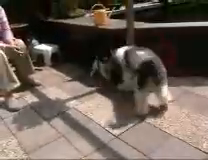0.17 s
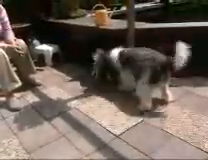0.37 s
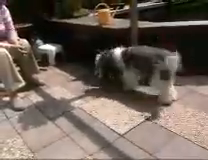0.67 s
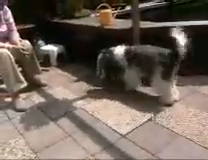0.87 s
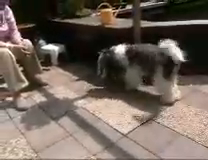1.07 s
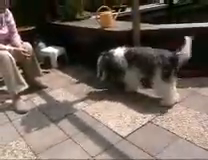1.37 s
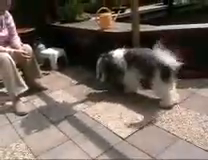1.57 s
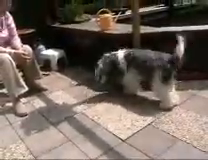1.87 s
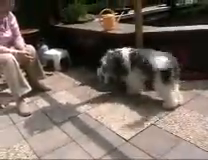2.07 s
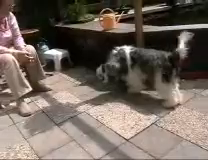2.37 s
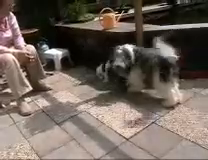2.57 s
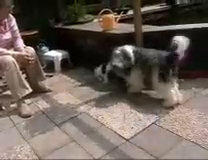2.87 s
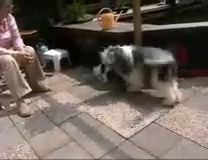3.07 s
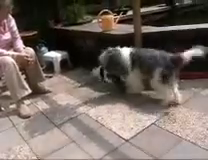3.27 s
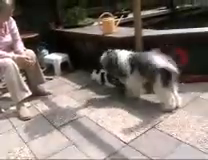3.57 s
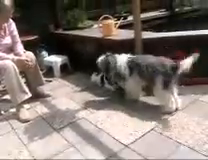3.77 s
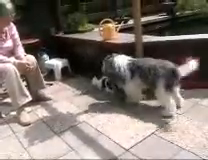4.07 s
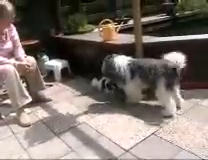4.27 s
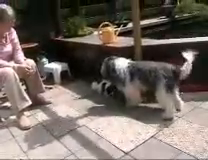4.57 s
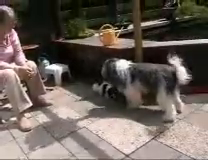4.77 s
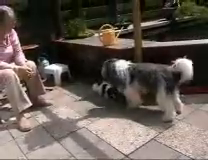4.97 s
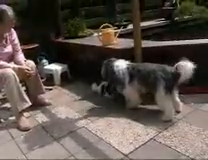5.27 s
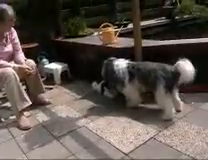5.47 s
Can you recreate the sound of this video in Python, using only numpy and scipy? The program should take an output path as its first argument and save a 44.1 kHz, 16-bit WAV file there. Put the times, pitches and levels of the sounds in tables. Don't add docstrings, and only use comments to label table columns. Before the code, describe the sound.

Two quick barks, a lone one, then three more echo off patio walls; light panting, claws on paving, distant low drone and outdoor hiss.

```python
import sys
import numpy as np
from scipy import signal
from scipy.io import wavfile
from scipy.ndimage import uniform_filter1d

SR = 44100
rng = np.random.default_rng(int(sys.argv[2]) if len(sys.argv) > 2 else 0)


def generate_wav(signal):
    frames = np.transpose(np.atleast_2d(signal))
    scaled = np.clip(frames, -1, 1) * 32767
    pcm = np.round(scaled).astype(np.int16)
    wavfile.write(sys.argv[1], SR, pcm)


def to_linear_factor(level_db):
    exponent = np.asarray(level_db, float) / 20
    return 10 ** exponent


N = 248705
TIME = np.arange(N) / SR


def evened(x):
    return x / np.sqrt(np.mean(x ** 2) + 1e-20)


def read(points, hz):
    f, value = np.transpose(points)
    return np.interp(np.log(hz + 1), np.log(f + 1), value)


def add(mix, s, sound):
    part = mix[round(s * SR):][:len(sound)]
    part += sound[:len(part)]


def resonate(x, hz, width):
    turn = np.exp(2j * np.pi * np.cumsum(hz * np.ones(len(x))) / SR)
    r = np.exp(-np.pi * width / SR)
    return 2 * (turn * signal.lfilter([1 - r], [1, -r], x / turn)).real


def resonate_twice(x, hz, width):
    return resonate(resonate(x, hz, width), hz, width)


def highpass(x, order, hz):
    return signal.sosfilt(signal.butter(order, hz, "high", fs=SR, output="sos"), x)


def wander(length, span):
    return evened(uniform_filter1d(uniform_filter1d(rng.standard_normal(length), span), span))


def step(x):
    return .5 + .5 * np.tanh(x)


# (frequency [Hz], density [dB per Hz])
WASH_SPECTRUM = [(30, -35.5), (70, -6), (144, -9), (330, -12.5), (600, -16.5), (1000, -15.5), (1220, -20.5),
                 (1450, -17.5), (2440, -22), (5780, -24.5), (8360, -30.5), (9500, -41)]
# (frequency [Hz], left-right coherence [0-1])
COHERENCE = [(40, 0.9), (160, 1), (450, 0.98), (1240, 0.59), (3400, 0.32), (5500, 0.9), (7500, 1)]
WASH_DB = -45


def wash():
    frames, hz = N // 256 + 5, np.fft.rfftfreq(1024, 1 / SR)
    a, b, c, d, patches = rng.standard_normal((frames, 513, 5)).T
    patches = evened(uniform_filter1d(uniform_filter1d(patches, 12, 0), 14, 1))
    flicker = evened(uniform_filter1d(rng.standard_normal(frames), 4))
    same = np.clip(read(COHERENCE, hz), 0, 1)[:, None]
    mid = a + 1j * b
    side = 0.51 * np.sqrt((1 - same) / (1 + same)) * (c + 1j * d)
    from_notch = (hz + 450) % 905 - 450
    notch_db = -9 * np.exp(-(from_notch / 35) ** 2) * (hz > 400) * (hz < 2200)
    z = np.array([mid + side, mid - side])
    z *= to_linear_factor((read(WASH_SPECTRUM, hz) + notch_db)[:, None] + 0.5 * patches + 1.8 * flicker)
    noise = signal.istft(z, nperseg=1024, noverlap=768)[1][:, :N]
    return to_linear_factor(WASH_DB - 0.5) * evened(noise)


def wind():
    band = signal.butter(3, [30, 90], "band", fs=SR, output="sos")
    rumble = signal.sosfilt(band, rng.standard_normal((2, N)))
    rumble = evened(rumble) * to_linear_factor(2.3 * wander(N, 5000) - 69.5)
    return rumble + 0.3 * rumble[::-1]


# (time [s], level [dB])
ENGINE_LOAD = [(0, -53), (.25, -47.5), (.4, -56.5), (1.0, -51.5), (1.18, -47.5), (1.55, -49), (1.65, -58.5),
               (2.06, -53), (2.18, -52), (2.3, -51), (2.6, -53.5), (2.98, -42.5), (3.2, -47.5),
               (4.1, -49.5), (4.37, -43.5), (4.75, -50), (5.36, -45.5), (5.5, -59)]
HUM_HZ, HUM_WAVER = 111, .012
DRONE_DB, DRONE_FOLLOWS = -55, 0.74


def hum():
    level_db = np.interp(TIME, *np.transpose(ENGINE_LOAD))
    hz = HUM_HZ * (1 + HUM_WAVER * wander(N, 4000))
    drone_db = DRONE_DB + DRONE_FOLLOWS * (level_db + 55.5) - level_db
    line = np.sqrt(2) * np.sin(2 * np.pi * np.cumsum(hz) / SR)
    line *= 1 + 0.2 * wander(N, 900)
    fuzz = evened(resonate_twice(rng.standard_normal(N), hz, 22))
    apart = evened(resonate_twice(rng.standard_normal(N), hz, 22))
    drone = evened(resonate(resonate(rng.standard_normal(N), 1.75 * hz, 30), 1.8 * hz, 34))
    mid = 1.45 * line + .5 * fuzz + to_linear_factor(drone_db - 3.0) * drone
    return to_linear_factor(level_db - 3.5) * np.array([mid + 0.18 * apart, mid - 0.19 * apart])


# (time of full force [s], length [s], held level [dB], sag over the bark [dB])
BARK_TIMES = [
    (.347, 0.2, -16, -9),
    (.618, 0.14, -14, -11),
    (1.778, 0.18, -15, -9.5),
    (3.093, .2, -12.5, -14.5),
    (3.401, 0.14, -16, -8.5),
    (3.797, 0.16, -14.5, -10),
]
# (rise [s], burst over the held level [dB], chest push [dB], bright rasp [dB])
BARK_ONSETS = [(.047, 1, -58.5, -64.5), (.022, -3.5, -45.5, -47), (.018, 7.5, -34.5, -36),
               (0.009, 8, -27.5, -28.5), (.009, 3, -47, -46.5), (.011, 4.5, -28, -41)]
# (roughness [0-1], second resonance [dB], upper resonances [dB],
# mouth opening [factor], extra gape at the burst [factor])
BARK_COLOURS = [(.36, -7, -2, 1.03, .18), (.24, 1, -1, 1.06, -.04), (.33, 2, -5, 1.08, -.08),
                (.32, 7, -6, 1.09, -.06), (.19, 2, -8, 1.0, .01), (.24, -1, -10, 1.01, .04)]
# (start [Hz], top [Hz], end [Hz], middle of the leap [s], half its length [s])
BARK_PITCHES = [(250, 722, 680, .027, .016), (310, 690, 610, .013, .02), (290, 715, 575, .024, .02),
                (400, 728, 652, .025, .012), (310, 622, 600, .017, .021), (330, 652, 600, .027, .021)]
RISE_DB, BURST_S, RELEASE_S, RELEASE_DB = -34, 0.016, 0.034, -10
DROP_FROM, DROP_SPAN, GAPE_S = .66, .12, .03
SECOND_FADE_DB, UPPER_FADE_DB = -17.5, -22.5
ROUGH_GROWTH, MOUTH_CLOSE = 0.29, .05
SLIP_DB, SLIP_S = 2.5, 0.012


def bark_shape(t, row, onset, colour, pitch):
    _, length, held_db, sag_db = row
    rise, burst_db, *_ = onset
    rough, second_db, upper_db, mouth, gape = colour
    start_hz, top_hz, end_hz, leap, half = pitch
    done = np.clip(t / length, 0, 1)
    slips_db = np.array([wander(len(t), int(SLIP_S * SR)) for control in range(3)])
    slips_db *= SLIP_DB * np.clip(t / 0.017, 0, 1)

    level_db = held_db + burst_db * np.exp(-abs(t) / BURST_S) + sag_db * done + slips_db[0]
    level_db += RISE_DB * np.clip(-t / rise, 0, 1)
    level_db += RELEASE_DB * np.clip(1 + (t - length) / RELEASE_S, 0, 1)
    hz = start_hz + (top_hz - start_hz) * step((t - leap) / half)
    hz -= (top_hz - end_hz) * step((done - DROP_FROM) / DROP_SPAN)
    second_db = second_db + SECOND_FADE_DB * step((done - .78) / 0.15) + slips_db[1]
    upper_db = upper_db + UPPER_FADE_DB * done ** 0.88 + slips_db[2]
    rough = rough * (1 + ROUGH_GROWTH * (done - .5))
    mouth = mouth * (1 - MOUTH_CLOSE * done ** 4) + gape * np.exp(-(t / GAPE_S) ** 2)
    return level_db, hz, second_db, upper_db, rough, mouth


# (frequency [Hz], width [Hz], level [dB])
THROAT_RESONANCES = [(685, 315, 2.5), (1304, 646, 0.5), (2020, 1060, 2), (2794, 680, -3), (4540, 2400, -22)]
CHEST_DB = -13.5


def bark(row, onset, colour, pitch):
    t = np.arange(-onset[0], row[1], 1 / SR)
    level_db, hz, second_db, upper_db, rough, mouth = bark_shape(t, row, onset, colour, pitch)
    rough = np.clip(rough, 0, 1)
    turns = np.cumsum(hz * (1 + 0.053 * rough * wander(len(t), 60))) / SR
    folds = sum(np.cos(2 * np.pi * k * turns) / k ** 0.073 for k in range(1, 11))
    folds = evened(folds) * (1 + 1.34 * rough * wander(len(t), 120))
    puffs = evened((0.43 + np.exp(-(turns % 1) / 0.34)) * rng.standard_normal(len(t)))
    puffs = highpass(puffs, 4, 520)

    opening_db = [0, second_db, upper_db, upper_db, -4 + 3 * wander(len(t), 900)]
    voice = 0
    for k, ((f, width, db), open_db) in enumerate(zip(THROAT_RESONANCES, opening_db)):
        noisy = np.clip(rough * (f / 900) ** 0.91, 0, 1)
        drive = (1 - noisy) * folds + 1.7 * noisy * puffs
        sign = (-1) ** k
        voice = voice + sign * to_linear_factor(db + open_db) * resonate_twice(drive, f * mouth, width)
    chest = to_linear_factor(CHEST_DB) * np.cos(2 * np.pi * turns) * np.clip(2 - hz / 300, 0, 1)
    voice = evened(voice) + chest

    treble = signal.butter(3, 3300, "high", fs=SR, output="sos")
    voice -= 0.39 * signal.sosfiltfilt(treble, voice)
    voice -= .75 * resonate(voice, 1870, 260)
    voice = highpass(voice, 2, 220)
    voice /= np.sqrt(uniform_filter1d(voice ** 2, 900) + 1e-9)
    return row[0] - onset[0], to_linear_factor(level_db - 2.0) * voice * signal.windows.tukey(len(t), .05)


def thump(s, db, crack_db):
    push = uniform_filter1d(rng.standard_normal(1400), 70)
    swell = np.exp(-((np.arange(1400) / SR - .012) / .009) ** 4)
    rasp = np.diff(rng.standard_normal(1401)) * swell
    return s - .008, to_linear_factor(db) * evened(push) * np.hanning(1400) + to_linear_factor(crack_db) * rasp


# (frequency [Hz], t60 [s])
WALL_DECAY = [(200, 0.67), (650, 1.64), (1300, 1.06), (2500, 0.84), (6000, 0.52)]


def yard(x, start, length, speed):
    taps = np.zeros((2, length))
    at = np.arange(start, length - 20, 20)
    at = at + rng.integers(0, 20, (2, len(at)))
    np.put_along_axis(taps, at, rng.choice([-1., 1.], at.shape), 1)
    hz, t, z = signal.stft(taps, SR, nperseg=256)
    decay = to_linear_factor(-60 * speed * t / read(WALL_DECAY, hz)[:, None])
    tail = signal.istft(z * decay, SR, nperseg=256)[1]
    tail = np.array([tail[0] + .55 * tail[1], tail[0] - .55 * tail[1]])
    return signal.fftconvolve(x[None], tail / np.linalg.norm(tail[0]), axes=1)[:, :N]


# (frequency [Hz], level [dB], t60 [s])
CAN_MODES = [(544, -27, 1.9), (628, -40, 2.3), (641.4, -36, 2.24), (653, -34.5, 2.32), (660.5, -30.5, 1.93),
             (716, -34.5, 1.82), (1280, -38, 0.7), (1375, -35.5, .8)]


def can(x):
    t = np.arange(2 * SR) / SR
    ring = sum(to_linear_factor(db - 46 - 60 * t / t60) * np.sin(2 * np.pi * hz * t) for hz, db, t60 in CAN_MODES)
    return signal.fftconvolve(x, ring)[:N] * np.array([[1.15], [.85]])


DUCK_DEPTHS = [3.4, 13.6, 6.8, 4.7, 9, 7.4]


def camera_gain():
    duck_db = np.zeros(N)
    for (s, length, *_), db in zip(BARK_TIMES, DUCK_DEPTHS):
        fall = np.clip((TIME - s) / 0.049, 0, 1)
        rise = np.clip(1 - (TIME - s - length - .06) / 0.32, 0, 1)
        duck_db = np.maximum(duck_db, db * fall * rise)
    return to_linear_factor(-duck_db)


# (time [s], length [s], frequency [Hz], level [dB], octave [dB])
WHISTLE_NOTES = [
    (0.436, 0.065, 1123, -28.5, -2),
]


def whistle(s, length, hz, db, octave_db):
    turns = np.cumsum(hz * (1 + 0.013 * wander(int(length * SR), 200))) / SR
    tone = np.sin(2 * np.pi * turns) + to_linear_factor(octave_db) * np.sin(4 * np.pi * turns)
    tone *= 1 + .5 * wander(len(tone), 150)
    return s, to_linear_factor(db) * tone * np.hanning(len(tone)) ** .5


# (time [s], peak level [dB], frequency [Hz])
CLAW_TICKS = [(0.8977, -70, 2760), (2.1143, -40.5, 5240), (2.333, -48, 5898), (2.3545, -49, 2703),
              (2.465, -43.5, 2650), (2.5189, -45, 2647), (2.843, -38, 3000), (3.011, -43, 2600),
              (4.1204, -50, 2600), (4.4367, -41, 3450), (4.9502, -47, 5960), (5.1135, -44, 2685),
              (5.3462, -45, 4470), (5.4053, -42.5, 5740), (5.6103, -48, 2940)]


def claw(s, db, hz):
    t = np.arange(900) / SR
    grit = rng.standard_normal(900) * to_linear_factor(-60 * t / .03)
    return s, to_linear_factor(db - 6.5) * evened(resonate_twice(grit, hz, 1100))


# (time [s], length [s], level [dB], mouth resonance [Hz], brightness [dB])
PANT_PUFFS = [
    (1.191, 0.084, -69, 1226, -5),
    (2.237, 0.061, -49.5, 1190, -0.5),
    (2.453, 0.1, -45.5, 1300, -9),
    (2.754, 0.096, -47, 1380, -25),
    (4.254, 0.13, -45.5, 1310, -5.5),
    (4.679, 0.089, -50, 1426, 0),
    (5.032, 0.071, -48.5, 1400, -5),
    (5.341, 0.045, -55.5, 1440, 6),
    (5.583, 0.077, -49, 1450, -6),
]


def pant(s, length, db, hz, bright_db):
    air = rng.standard_normal(int(length * SR))
    mouth = evened(resonate_twice(air, hz, 440))
    mouth = mouth + to_linear_factor(bright_db) * evened(resonate(air, 2000, 1300))
    return s, to_linear_factor(db) * mouth * np.hanning(len(air)) ** 0.38


# (time [s], left minus right [dB])
CAMERA_TURN = [(0, 2.4), (.8, 2.2), (1.2, .6), (1.8, 1), (3, 0), (5.64, -.3)]


def scene():
    voice, small = np.zeros(N), np.zeros(N)
    for row, onset, colour, pitch in zip(BARK_TIMES, BARK_ONSETS, BARK_COLOURS, BARK_PITCHES):
        add(voice, *bark(row, onset, colour, pitch))
        add(small, *thump(row[0], *onset[2:]))
    for row in WHISTLE_NOTES:
        add(voice, *whistle(*row))
    for row in CLAW_TICKS:
        add(small, *claw(*row))
    for row in PANT_PUFFS:
        add(small, *pant(*row))
    dog = (voice + small) / camera_gain()
    walls = to_linear_factor(-9) * yard(dog, 200, SR // 4, 9.)
    houses = to_linear_factor(-22.5) * yard(dog, 2000, 2 * SR, 1.77)
    near = dog + walls + houses + can(dog)
    lean_db = np.interp(TIME, *np.transpose(CAMERA_TURN)) * np.array([[.5], [-.5]])
    return (near + hum() + wash() + wind()) * to_linear_factor(lean_db)


# (frequency [Hz], readiness [dB])
MASK_READINESS = [(40, 12), (400, 8), (600, -20), (1500, -18), (2500, -8), (3700, 15), (4700, -1),
                  (5600, 5), (7500, 6), (9000, 0)]


def masked(x, below_db):
    hz, t, z = signal.stft(x, SR, nperseg=1024, noverlap=768)
    power_db = 10 * np.log10(uniform_filter1d((abs(z) ** 2).mean(0), 5, 1) + 1e-16)
    whim = 9 * rng.standard_normal((len(t) // 16 + 1, len(hz) // 3 + 1)).T
    whim = whim.repeat(3, 0).repeat(16, 1)[:len(hz), :len(t)]
    margin_db = power_db - power_db.max(0) + below_db - read(MASK_READINESS, hz)[:, None] + whim
    kept = .03 + .97 / (1 + np.exp(-np.clip(margin_db, -30, 30)))
    return signal.istft(z * kept, nperseg=1024, noverlap=768)[1][:, :N]


def band_limit(x):
    return signal.sosfilt(signal.butter(12, 9900, fs=SR, output="sos"), x)


def record(dry):
    heard = highpass(dry, 2, 48)
    ducked = 0.68 * np.tanh(heard * camera_gain() / 0.65)
    limited = signal.oaconvolve(ducked, signal.firwin(511, 8900, fs=SR)[None], "same")
    return band_limit(masked(limited, below_db=45))


dry = scene()
out = record(dry)
generate_wav(out)
```